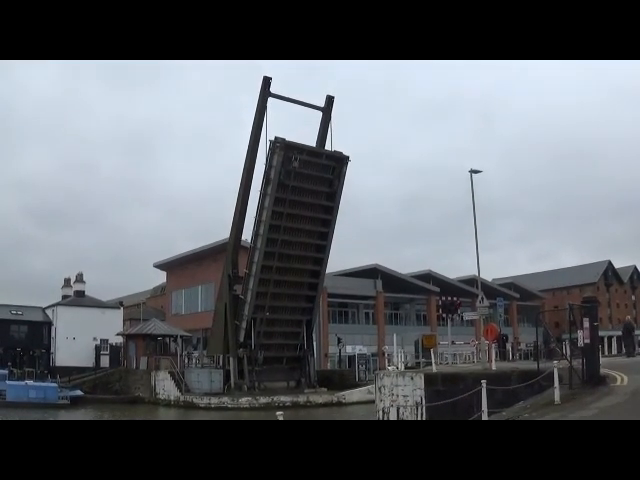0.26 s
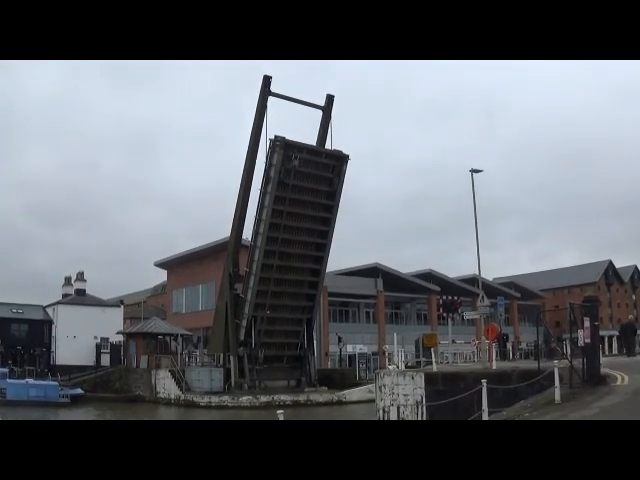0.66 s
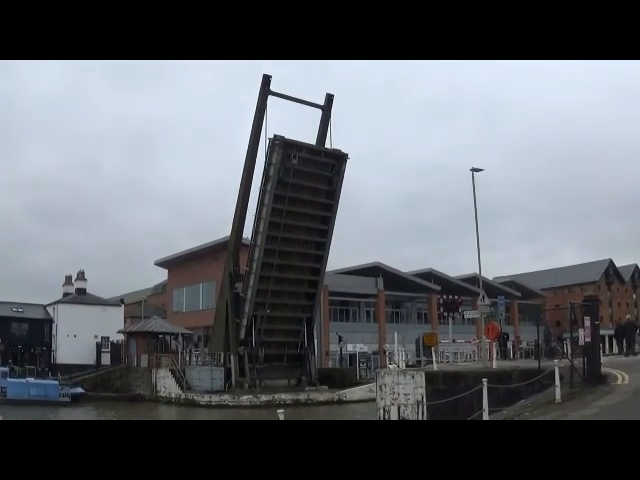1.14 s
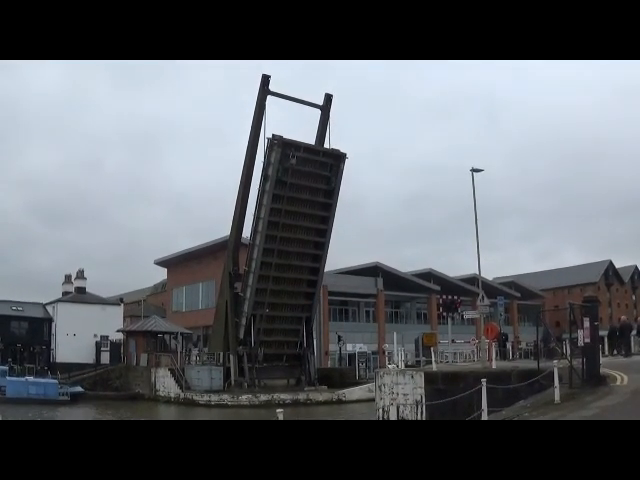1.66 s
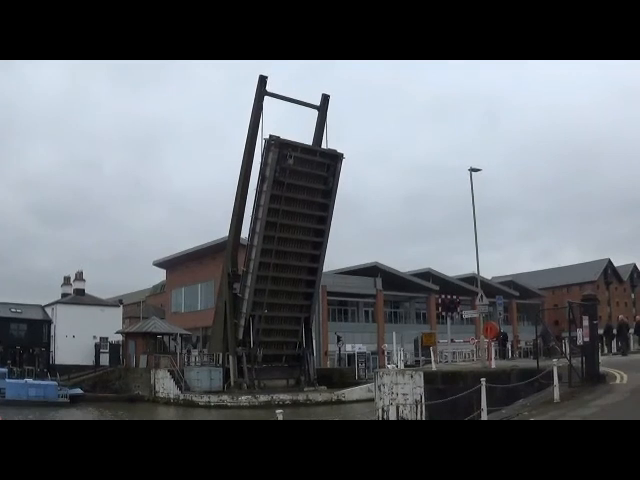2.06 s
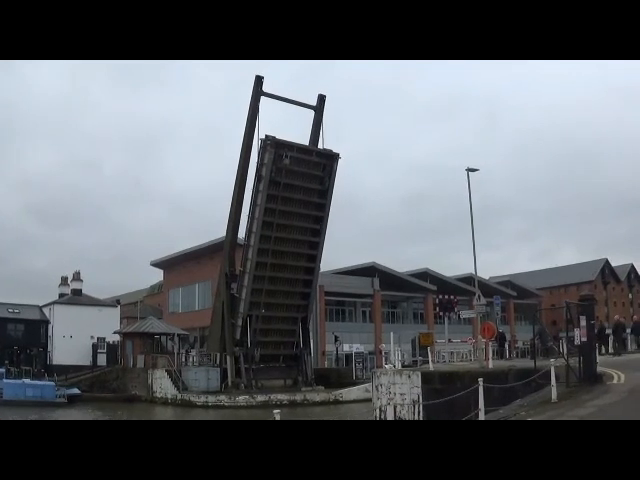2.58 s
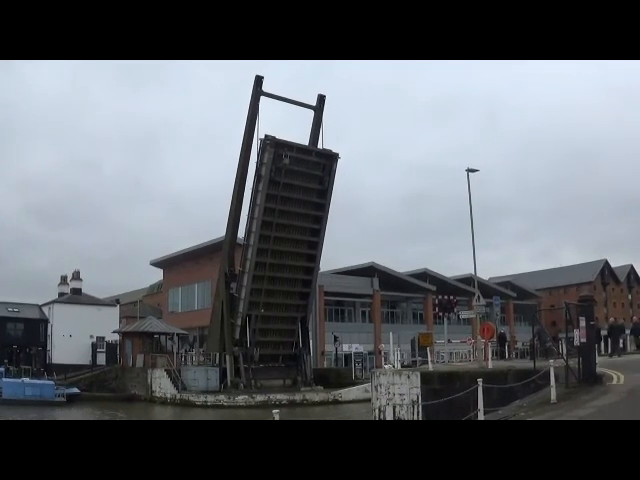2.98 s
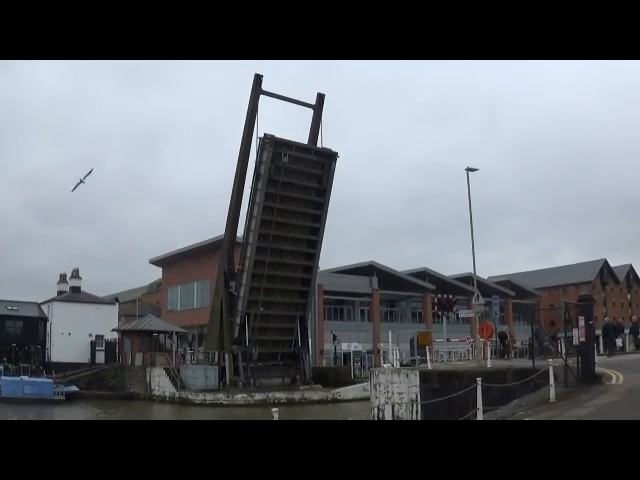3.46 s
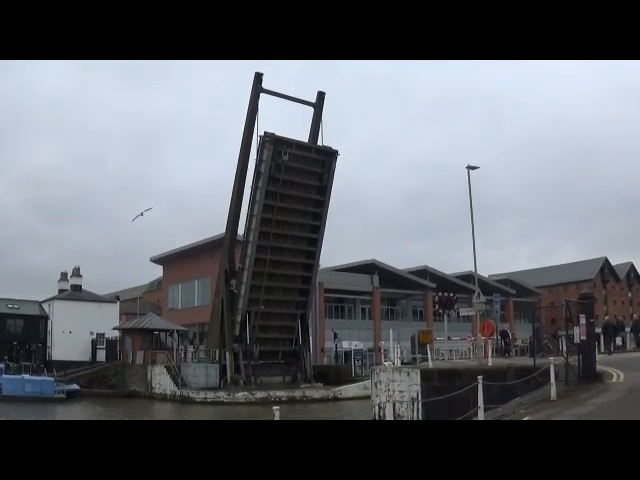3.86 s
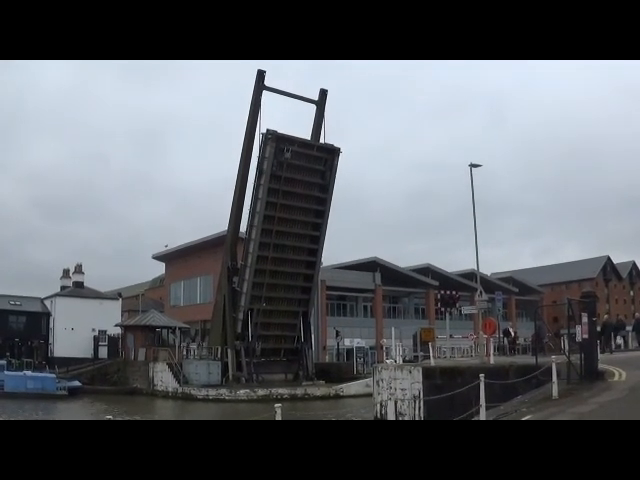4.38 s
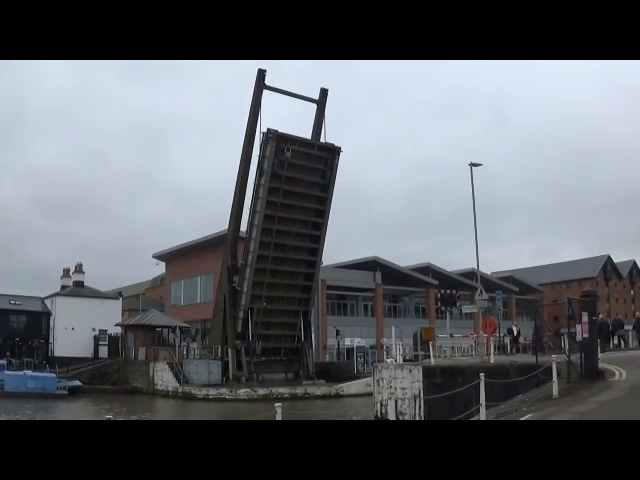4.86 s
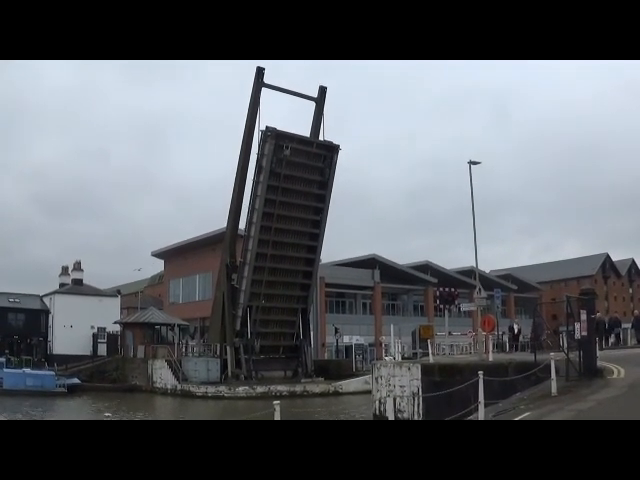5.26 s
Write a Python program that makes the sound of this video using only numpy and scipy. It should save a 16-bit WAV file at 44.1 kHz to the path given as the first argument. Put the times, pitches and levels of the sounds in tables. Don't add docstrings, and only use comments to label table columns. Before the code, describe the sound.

Bridge machinery drones beside a dock, stops with a hollow steel clunk, followed by a short scrape, a brief squeal and rumbling wind.

```python
import sys
import numpy as np
from scipy import signal
from scipy.fft import rfft, irfft, next_fast_len
from scipy.io import wavfile
from scipy.ndimage import uniform_filter1d, map_coordinates

SR = 44100
rng = np.random.default_rng(int(sys.argv[2]) if len(sys.argv) > 2 else 0)


def voltage_ratio(decibels):
    exponent = np.asarray(decibels, float) / 20
    return 10 ** exponent


def inscribe(sig):
    pcm = np.round(np.clip(np.atleast_2d(sig).T, -1, 1) * 32767)
    wavfile.write(sys.argv[1], SR, pcm.astype(np.int16))


N = 243852
T = np.arange(N) / SR

# time in seconds, tooth tone in dB.
PUMP_LOAD = [
    (0.0, -29.5),
    (1.3, -31),
    (2.25, -30),
    (2.94, -31.5),
    (3.5, -32.5),
    (3.9, -34.5),
    (4.12, -37.5),
    (4.16, -38.5),
    (4.2, -55),
]
# multiple, level in dB.
PUMP_ORDERS = [(1, 1), (1.5, -24.5), (2, -24), (2.5, -31.5), (3, -31), (5.53, -30.5), (14, -36)]
TOOTH_HZ = 223.43
PUMP_LEAN_DB, LEAN_PER_DB = 4.5, 0.77
WHINE_DB, WHINE_IDLE_DB = -56.5, -6
STRAIN_FROM_S, STRAIN_TO_S = 1.86, 3.9

# frequency in Hz, density in dB per Hz.
NOZZLE_SPECTRUM = [(9000, -27), (9300, -25), (9500, -4.5), (9750, -5.5), (10050, -9), (10350, -18),
                   (10700, -35)]
# frequency in Hz, density in dB per Hz.
FLOW_SPECTRUM = [(1400, -41), (1750, 6), (1900, 8), (2100, -8.5), (2850, 0), (3150, 4), (3450, 0),
                 (4000, -10), (4200, 1), (4450, -9.5), (5500, -11), (7600, -7.5), (9000, -12),
                 (11500, -10.5)]
WHISTLE_DB, HISS_DB, WHISTLE_WAVERS_DB = -53, -57.5, 1.2
SHUT_S, WHISTLE_ENDS_S, SEALED_S = 2.27, 2.44, 3.34
WHISTLE_DROP_DB, WHISTLE_DIES_DB_PER_S, HISS_DIES_DB_PER_S = 7.5, 3, 10.5

# frequency in Hz, level in dB, decay time t60 in seconds.
LATCH_MODES = [(1470, -5, 0.054), (2190, 4, 0.044), (2480, -2, 0.056), (2950, -4, .04)]
LATCH_S, LATCH_DB = 4.186, -26.5

# time in seconds, peak in dB, bright share in dB, t60 in seconds.
CONTACTS = [
    (4.185, -22.5, -40, 0.11),
    (4.196, -17.5, -8, 0.25),
    (4.197, -28, 9.5, 0.048),
    (4.274, -25.5, -5, 0.18),
    (4.324, -41.5, 9.5, 0.097),
    (4.36, -38.5, -9.5, 0.42),
]
# frequency in Hz, density in dB per Hz.
PLATE_SPECTRUM = [(400, -12), (700, -2), (1000, 0), (1400, -1.5), (1800, 4), (2300, -2.5), (3000, -2.5),
                  (3600, -8.5), (5000, -15), (9000, -14.5)]
# frequency in Hz, width in Hz, level in dB.
BOLT_TIGHT = [(10030, 49, -1), (9900, 32, -12), (10220, 90, -14)]
# frequency in Hz, width in Hz, level in dB.
BOLT_LOOSE = [(9680, 90, 0), (9980, 80, -11)]
LOOSENS_S = 4.3
# time in seconds, level in dB, hold in seconds.
BOOMS = [
    (4.183, -24, 0.045),
    (4.234, -24, 0.035),
    (4.287, -21, .05),
    (4.364, -26, 0.007),
    (4.413, -33, 0.035),
]
# frequency in Hz, width in Hz, level in dB.
DECK_MODES = [(103, 31, -2.5), (143.5, 14, 4), (201, 43, -3.5), (328, 29, -11.5), (386, 14, -8.5),
              (486, 30, -12), (605.5, 25, -10.5)]
BOOM_RISE_S, BOOM_T60_S = 0.011, 0.21

# time in seconds, scrape in dB, bright part in dB.
BITES = [
    (4.668, -40, -51),
    (4.698, -39.5, -60),
    (4.745, -49, -66),
]
# frequency in Hz, width in Hz, level in dB.
SHOE_MODES = [(1330, 110, 0.5), (1516, 110, 0.5), (1660, 150, -5)]
# frequency in Hz, width in Hz, level in dB.
SHOE_HIGH_MODES = [(5530, 60, 3), (7100, 200, -12), (8800, 250, -16), (4900, 600, -10)]
BITE_RISE_S, SCRAPE_T60_S, BRIGHT_T60_S = 0.0017, 0.22, 0.09
# multiple, level in dB.
PAD_ORDERS = [(2, -1.5), (3, -5.5), (4, -17), (5, -6)]
# time in seconds, pressure in dB.
PRESSURE = [
    (4.84, -27),
    (4.91, -16),
    (4.96, -1),
    (5.0, -0.5),
    (5.1, -0.5),
    (5.235, -4.5),
    (5.26, -11),
    (5.315, -9),
    (5.34, -38),
]
# time in seconds, height in dB, half length in seconds.
SLIP = [
    (5.255, -10, 0.011),
]
# time in seconds, height in dB, half length in seconds.
LOW_CATCH = [
    (4.955, -12, .02),
    (5.0, 6.5, 0.03),
]
HIGH_DB, OVER_DB, RUB_DB = -42, -55, -51.5
HIGH_GROWS, RUB_GROWS = 0.46, 0.78
LOW_DB, LOW_FROM_S, LOW_TO_S, LOW_RISE_S, LOW_FALL_S = -48.5, 4.8, 5.31, 0.025, 0.02
LOW_SAG_DB, LOW_SAGS_S = -5, 5.24

# frequency in Hz, t60 in seconds.
QUAY_DECAY = [(200, 0.25), (2000, 0.63), (10000, 0.15)]

# time in seconds, level in dB.
GUST_LEVEL = [
    (4.55, -41),
    (4.64, -35),
    (4.74, -28),
    (5.0, -25.5),
    (5.15, -23),
    (5.53, -24.5),
]
# frequency in Hz, density in dB per Hz.
BUFFET_SPECTRUM = [(30, -40), (60, -14), (85, 1), (160, 0.5), (250, -3.5), (360, -12), (450, -15),
                   (650, -22), (1000, -28.5), (1500, -32.5), (2500, -74)]
# frequency in Hz, density in dB per Hz.
SURGE_SPECTRUM = [(15, -25), (30, -8), (50, 8), (70, 9.5), (95, -23), (200, -81)]
# frequency in Hz, left-right correlation.
GUST_ALIKE = [(60, 0.75), (130, 0.54), (260, -0.062), (540, -0.45), (1200, 0.25)]
# frequency in Hz, left-right correlation.
SURGE_ALIKE = [(30, .72), (80, .72)]
# time in seconds, thump in dB, surge in dB, left minus right in dB.
EDDIES = [
    (4.765, 7, 1, -0.5),
    (4.85, 10.5, 12, 3.5),
    (4.94, 6, 18, -2),
    (5.02, 5, 9, -2.5),
    (5.088, 5, 15, 2.5),
    (5.18, 2, 1, -2.5),
    (5.282, 1.5, 19.5, 0),
    (5.34, 2.5, 6.5, 0.5),
    (5.4, 1.5, 10, 0),
    (5.52, 3, 13, -3.5),
]
EDDY_S, SURGE_S, SURGE_DB = 0.016, 0.028, -42

# time in seconds, firing rate in Hz, third order in dB.
IDLE = [
    (0.0, 108.6, -48.5),
    (0.3, 109.3, -48.5),
    (1.85, 108.1, -47),
    (1.95, 109.6, -40),
    (2.9, 109.7, -43.5),
    (3.36, 108.5, -47.5),
    (3.86, 107.7, -41),
    (4.12, 109, -50.5),
    (4.2, 108.6, -35),
]
# multiple of a third of the firing rate, level in dB, blur in Hz.
IDLE_ORDERS = [(1.95, -8.5, 1.74), (3, 2, 1.37), (4.002, -12, 5.07)]
# time in seconds, frequency in Hz, level in dB.
LORRY = [
    (2.9, 38.9, -60),
    (3.27, 40.3, -45),
    (3.78, 40, -50),
    (4.05, 43.2, -43),
    (4.4, 43.3, -50),
    (4.7, 42.7, -50),
]
LOPE_PER_S, LOPE_PEAK_S, LOPE_DB, STEADY_S = 3.75, 0.15, 4, 1.88

# frequency in Hz, density in dB per Hz.
RUMBLE_SPECTRUM = [(20, -13), (50, -1.5), (100, 0.5), (150, 0.5), (200, -1.5), (330, -4), (500, -8),
                   (800, -15), (1500, -54)]
# frequency in Hz, density in dB per Hz.
WASH_SPECTRUM = [(240, -13), (400, -20), (453, -4.5), (472, -16), (564, -5.5), (684, -8), (913, -4.5),
                 (1890, -13.5), (2290, -13), (2630, -18), (3230, -19.5), (4030, -26.5), (10700, -37),
                 (13900, -74), (22000, -120)]
# frequency in Hz, left-right correlation.
DOCK_ALIKE = [(60, 0.77), (130, 0.99), (260, 0.72), (540, 0.63), (1130, 0.57), (2360, 0.69), (4910, 0.61),
              (10200, 0.75)]
# time in seconds, height in dB, half length in seconds.
RUMBLE_SWELLS = [
    (3.98, 3, .2),
    (4.45, 7.5, 0.11),
    (5.08, 10, 0.24),
]
# time in seconds, height in dB, half length in seconds.
WASH_SWELLS = [
    (3.3, -0.5, 0.45),
    (4.78, 2, 0.28),
]
RUMBLE_DB, WASH_DB = -42.5, -44


def unit(x):
    return x / np.sqrt(np.mean(x ** 2) + 1e-20)


def along(points, hz):
    f, v = np.transpose(points)
    return np.interp(np.log(hz + 1), np.log(f + 1), v)


def curves(rows):
    s, *cols = np.transpose(rows)
    return [np.interp(T, s, c) for c in cols]


def ramp(start, length):
    return np.clip((T - start) / length, 0, 1)


def sounding(rows, fade):
    return np.clip(np.minimum(T - rows[0][0], rows[-1][0] - T) / fade + 1, 0, 1)


def swells(rows):
    return sum(height * np.exp(-0.5 * ((T - s) / half) ** 2) for s, height, half in rows)


def struck(s, db, rise, t60, hold=0):
    t = np.maximum(T - s, 0)
    return voltage_ratio(db - 60 * np.maximum(t - hold, 0) / t60) * (1 - np.exp(-t / rise))


def wobble(rate):
    return map_coordinates(rng.standard_normal(int(N * rate / SR) + 4), [T * rate])


def tone(hz):
    return np.sqrt(2) * np.sin(2 * np.pi * (np.cumsum(hz) / SR + rng.random()))


def filtered(x, response):
    m = next_fast_len(N + SR // 2)
    return irfft(rfft(x, m) * response(np.fft.rfftfreq(m, 1 / SR)), m)[..., :N]


def colour(spectrum):
    return lambda hz: voltage_ratio(along(spectrum, hz))


def resonant(modes):
    def response(f):
        total = 0
        for k, (centre, width, db) in enumerate(modes):
            damping = 1j * f * width
            total = total + (-1) ** k * voltage_ratio(db) * damping / (centre * centre - f * f + damping)
        return total
    return response


def rush(gain, alike, patchy_db):
    z = signal.stft(rng.standard_normal((2, N)), nperseg=512)[2]
    field = uniform_filter1d(rng.standard_normal(z.shape[1:]), size=6, axis=0)
    field = uniform_filter1d(field, size=14, axis=1)
    pair = signal.istft(z * voltage_ratio(patchy_db * unit(field)), nperseg=512)[1][:, :N]

    def mid_side_gain(hz):
        angle = np.arccos(np.clip(along(alike, hz), -1, 1)) / 2
        return gain(hz) * np.array([np.cos(angle), np.sin(angle)])
    mid, side = filtered(pair, mid_side_gain)
    return unit(np.array([mid + side, mid - side]))


def even(x, span):
    power = uniform_filter1d(np.mean(x ** 2, axis=0), size=int(span * SR))
    return x / np.sqrt(np.abs(power) + 1e-6)


def placed(x, pan_db):
    return np.array([x * voltage_ratio(pan_db / 2), x * voltage_ratio(-pan_db / 2)])


def pump():
    load_db, = curves(PUMP_LOAD)
    tone_db = load_db + 0.4 * wobble(7)
    pan_db = PUMP_LEAN_DB + LEAN_PER_DB * np.maximum(load_db - load_db.max(), -8)
    slack = 1 - ramp(STRAIN_FROM_S, 0.1) + ramp(STRAIN_TO_S, 0.06)
    whine_db = WHINE_DB + slack * (WHINE_IDLE_DB + 4 * wobble(8))
    hz = TOOTH_HZ + 0.2455 * wobble(3)
    hum = sum(voltage_ratio(db + 0.96 * min(k, 2.5) * wobble(6.72)) * tone(k * hz) for k, db in PUMP_ORDERS)
    whine = tone(10 * hz) * voltage_ratio(0.9 * wobble(40)) + voltage_ratio(-8.5) * tone(11 * hz)
    mono = voltage_ratio(tone_db) * hum + voltage_ratio(whine_db - 1.5) * whine
    return placed(mono * sounding(PUMP_LOAD, fade=0.016), pan_db)


def valve():
    closing_s = np.maximum(T - SHUT_S, 0)
    whistle_db = WHISTLE_DB + WHISTLE_WAVERS_DB * wobble(9.22) - WHISTLE_DIES_DB_PER_S * closing_s
    whistle_db = whistle_db - WHISTLE_DROP_DB * ramp(SHUT_S, 0.06) - 9 * ramp(WHISTLE_ENDS_S, 0.08)
    hiss_db = HISS_DB - HISS_DIES_DB_PER_S * closing_s
    jet = rush(colour(NOZZLE_SPECTRUM), [(9000, 0.94)], patchy_db=-1.5)
    whistle = voltage_ratio(whistle_db + 0.85 * wobble(29.23)) * jet
    hiss = voltage_ratio(hiss_db + 9.0) * rush(colour(FLOW_SPECTRUM), DOCK_ALIKE, patchy_db=1.44)
    return (whistle + hiss) * (1 - ramp(SEALED_S, 0.28))


def latch():
    t = np.maximum(T - LATCH_S, 0)
    ring = sum(voltage_ratio(db - 60 * t / t60) * np.sin(2 * np.pi * hz * t) for hz, db, t60 in LATCH_MODES)
    return placed(voltage_ratio(LATCH_DB) * ring * (1 - np.exp(-t / 0.003)), pan_db=2.0)


def clank():
    rattle, bright = np.zeros(N), np.zeros(N)
    for s, db, bright_db, t60 in CONTACTS:
        blow = struck(s, db, 0.0014, t60)
        rattle += blow
        bright += blow * voltage_ratio(bright_db)
    chatter = voltage_ratio(0.87 * wobble(300))
    plate_noise = rush(colour(PLATE_SPECTRUM), [(500, 0.74), (3000, 0.89)], patchy_db=-2)
    plate = voltage_ratio(-9) * rattle * chatter * plate_noise
    tight = even(rush(resonant(BOLT_TIGHT), [(9000, 0.97)], patchy_db=1), span=0.015)
    loose = even(rush(resonant(BOLT_LOOSE), [(9000, 0.97)], patchy_db=1), span=0.015)
    slack = ramp(LOOSENS_S, 0.05)
    bolt = voltage_ratio(-8.0) * bright * ((1 - slack) * tight + slack * loose)
    hiss_noise = rush(colour([(2500, -17), (5000, 10), (11000, -9)]), [(5000, 0.82)], patchy_db=4)
    hiss = voltage_ratio(-17) * bright * hiss_noise
    deck = even(rush(resonant(DECK_MODES), [(60, 0.42), (130, 0.89), (500, 0.99)], patchy_db=1.5), span=0.036)
    swing = sum(struck(s, db - 4.0, BOOM_RISE_S, BOOM_T60_S, hold) for s, db, hold in BOOMS)
    return plate + bolt + hiss + deck * swing


def shoe():
    body = even(rush(resonant(SHOE_MODES), [(1500, 0.85)], patchy_db=0), span=0.03)
    top = rush(resonant(SHOE_HIGH_MODES), [(5000, 0.8)], patchy_db=0)
    scrape = sum(struck(s, db, BITE_RISE_S, SCRAPE_T60_S) for s, db, _ in BITES)
    bright = sum(struck(s, db, BITE_RISE_S, BRIGHT_T60_S) for s, _, db in BITES)
    return scrape * body + bright * top


def pads():
    low_db = LOW_DB + swells(LOW_CATCH) + LOW_SAG_DB * ramp(LOW_SAGS_S, 0.02) + 2.6 * wobble(53)
    low_on = ramp(LOW_FROM_S - LOW_RISE_S, LOW_RISE_S) - ramp(LOW_TO_S, LOW_FALL_S)
    low = voltage_ratio(low_db) * tone(1803 + 5 * wobble(50)) * low_on
    press_db, = curves(PRESSURE)
    grip_db = swells(SLIP)
    high_db = HIGH_DB + HIGH_GROWS * press_db + grip_db
    over_db = OVER_DB + press_db + 0.47 * grip_db
    rub_db = RUB_DB + RUB_GROWS * press_db + 0.6 * grip_db
    hz = 1846 + 6 * wobble(70)
    high = voltage_ratio(high_db + 1.5 * wobble(70)) * (tone(hz) + voltage_ratio(-8) * tone(hz + 28))
    for k, db in PAD_ORDERS:
        level = voltage_ratio(over_db) * voltage_ratio(db + 2.7 * wobble(70))
        overtone = tone(k * (hz + 9 * wobble(120)))
        mixed = tone(k * hz - 43 + 40 * wobble(120))
        high += level * (overtone + voltage_ratio(-4.0) * mixed)
    rub_spectrum = [(3000, 10.5), (5500, 4), (7200, 6), (8300, -4), (9200, 1), (11000, -6)]
    rub_noise = rush(colour(rub_spectrum), [(5000, 0.75)], patchy_db=-3.5)
    rub = voltage_ratio(rub_db + 1.5 + 1.8 * wobble(45)) * rub_noise
    on = sounding(PRESSURE, fade=0.02)
    return placed(low + on * high, pan_db=1.0) + on * rub


def quay(x):
    hz, t, z = signal.stft(rng.standard_normal((2, SR // 2)), SR, nperseg=256)
    decay = voltage_ratio(-60 * t / along(QUAY_DECAY, hz)[:, None])
    tail = signal.istft(z * decay, SR, nperseg=256)[1]
    return signal.fftconvolve(x, tail / np.linalg.norm(tail[0]), axes=1)[:, :N]


def gust():
    buffet_db = curves(GUST_LEVEL)[0] + swells([(s, thump, EDDY_S) for s, thump, _, _ in EDDIES])
    surge_db = SURGE_DB + swells([(s, push, SURGE_S) for s, _, push, _ in EDDIES])
    pan_db = swells([(s, pan, SURGE_S) for s, _, _, pan in EDDIES])
    lumps = voltage_ratio(3.0 * np.array([wobble(70), wobble(70)]))
    buffet = even(lumps * rush(colour(BUFFET_SPECTRUM), GUST_ALIKE, patchy_db=1.0), span=0.053)
    surge = even(rush(colour(SURGE_SPECTRUM), SURGE_ALIKE, patchy_db=2), span=0.07)
    lean = voltage_ratio(np.array([pan_db + 1.5, -pan_db - 0.5]) / 2)
    wind = voltage_ratio(buffet_db + 1.0) * buffet + voltage_ratio(surge_db) * surge
    return lean * wind * sounding(GUST_LEVEL, fade=0.084)


def diesels():
    hz, db = curves(IDLE)
    lope = np.cos(2 * np.pi * LOPE_PER_S * (T - LOPE_PEAK_S))
    db = db + LOPE_DB * lope * (1 - ramp(STEADY_S, 0.05))
    idle = sum(voltage_ratio(level + 1.2 * wobble(11)) * tone(k * hz / 3 + blur * wobble(15))
               for k, level, blur in IDLE_ORDERS)
    near_hz, near_db = curves(LORRY)
    lorry = voltage_ratio(near_db + 2.5 * wobble(8)) * tone(near_hz) * sounding(LORRY, fade=0.33)
    return placed(voltage_ratio(db) * idle * sounding(IDLE, fade=0.85) + lorry, pan_db=1.5)


def dock():
    rumble_db = RUMBLE_DB + swells(RUMBLE_SWELLS) + 0.38 * wobble(2.7)
    wash_db = WASH_DB + swells(WASH_SWELLS) + 0.5 * wobble(2.01)
    rumble = voltage_ratio(rumble_db) * rush(colour(RUMBLE_SPECTRUM), DOCK_ALIKE, patchy_db=2.0)
    wash = voltage_ratio(wash_db) * rush(colour(WASH_SPECTRUM), DOCK_ALIKE, patchy_db=1.25)
    return (rumble + wash) * voltage_ratio([[0.6], [-0.6]])


def scene():
    steel = latch() + clank() + shoe() + pads()
    return steel + voltage_ratio(-9.5) * quay(steel) + pump() + valve() + gust() + diesels() + dock()


def low_pass(x):
    return signal.sosfilt(signal.butter(12, 11060, fs=SR, output="sos"), x)


def record(dry):
    fade_s = 0.004
    mix = dry * (1 - ramp(N / SR - fade_s, fade_s))
    return low_pass(mix)


dry = scene()
out = record(dry)
inscribe(out)
```